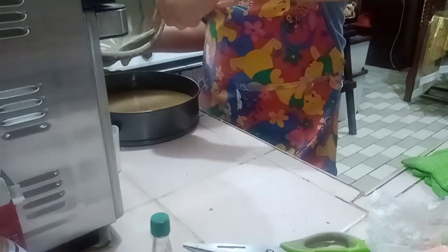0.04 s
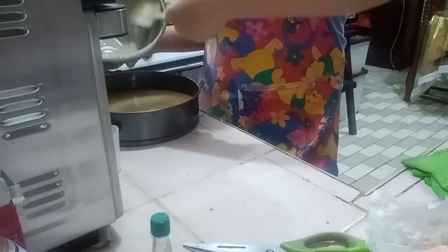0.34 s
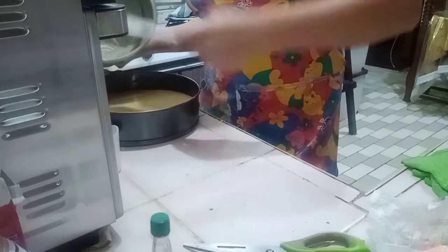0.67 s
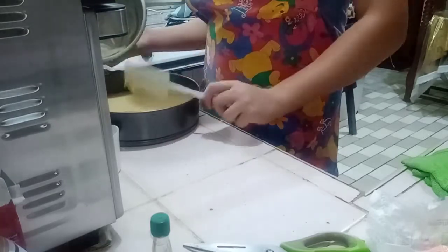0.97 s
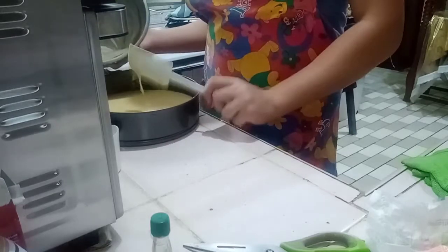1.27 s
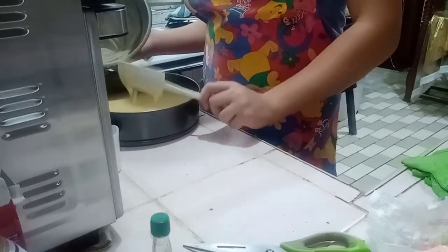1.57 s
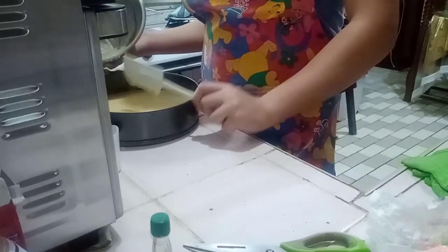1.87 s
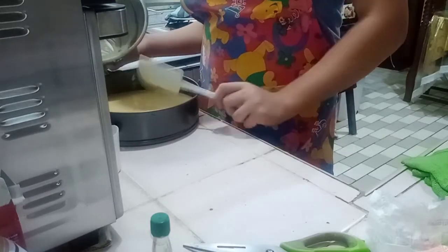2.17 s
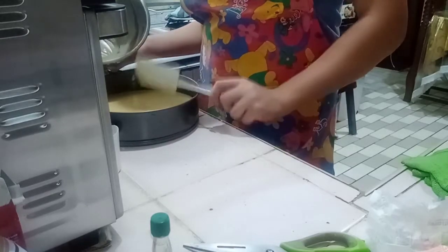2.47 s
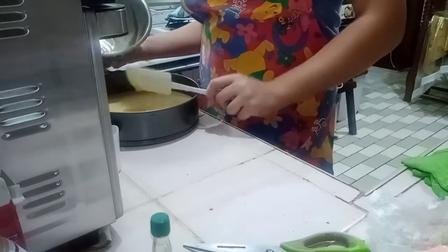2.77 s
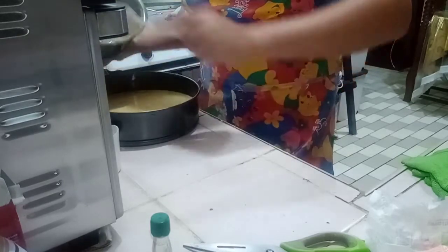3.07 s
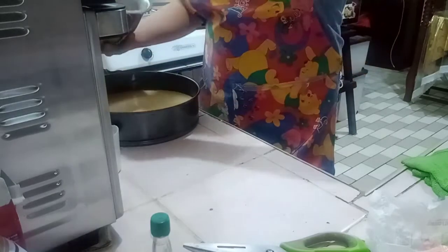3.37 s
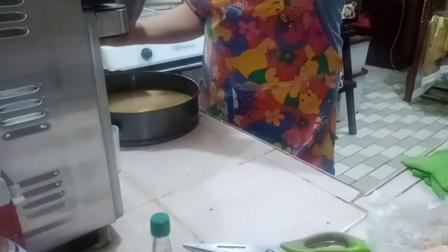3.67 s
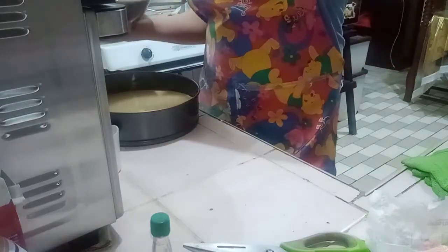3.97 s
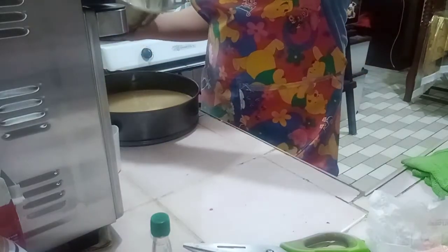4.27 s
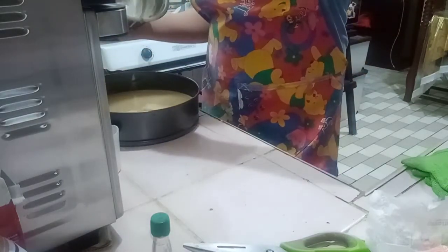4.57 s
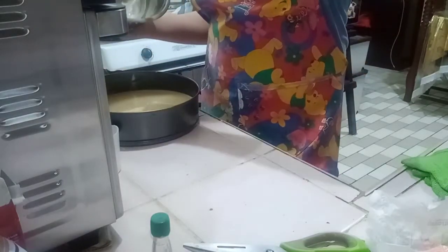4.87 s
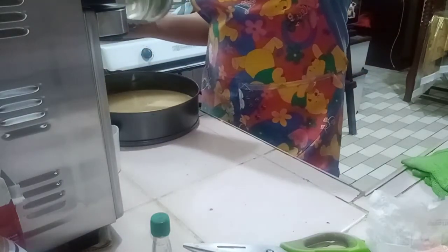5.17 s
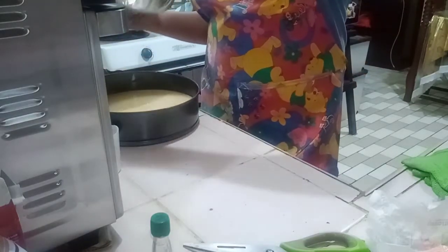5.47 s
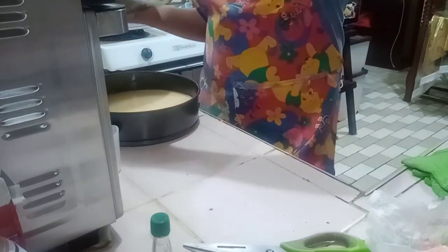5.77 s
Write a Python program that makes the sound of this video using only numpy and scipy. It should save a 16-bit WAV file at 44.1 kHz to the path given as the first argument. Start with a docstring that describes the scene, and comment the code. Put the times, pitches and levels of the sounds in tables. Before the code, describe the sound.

A quick run of sharp clicks and soft thuds comes from a spatula striking the rim of a metal mixing bowl. After a brief pause, the spatula lands on the counter with a clatter and a low thump. Irregular clinks and light scrapes follow as the bowl is handled, its ring cut short each time. The microphone is nearby in a small, slightly echoing kitchen, with a faint, airy appliance hum underneath.

```python
"""A spatula is tapped eleven times on a hand-held metal bowl to shake off batter, in a tiled kitchen.
With each tap the shaft clicks on the rim and the soft blade rebounds with dull thuds. The spatula is
put down with a knock that shakes the worktop. The bowl is turned in the hand, clinking and scraping,
its ring soon choked by hand and batter. An appliance hums underneath."""
import sys
import numpy as np
from scipy import signal
from scipy.fft import rfft, irfft
from scipy.io import wavfile
from scipy.ndimage import uniform_filter1d

SR = 44100
rng = np.random.default_rng(int(sys.argv[2]) if len(sys.argv) > 2 else 0)


def bounce(signal):
    """Save signal as a 16-bit WAV file at the path given by the first command-line argument."""
    frames = np.transpose(np.atleast_2d(signal))
    limited = np.clip(frames, -1, 1)
    pcm = np.round(limited * 32767).astype(np.int16)
    wavfile.write(sys.argv[1], SR, pcm)


N = 256441
T = np.arange(int(0.7 * SR)) / SR  # seconds within one event


def amp(db):
    """Decibels to gain."""
    return 10 ** (np.asarray(db) / 20)


def unit_rms(x):
    """Scales to unit rms."""
    return x / np.sqrt(np.mean(x ** 2) + 1e-20)


def curve_at(points, hz):
    """Reads a table on a log-frequency axis."""
    freqs, values = np.transpose(points)
    return np.interp(np.log(hz + 1), np.log(freqs + 1), values)


def add(mix, start, sound):
    """Mixes a sound in at a start time in seconds."""
    part = mix[round(start * SR):][:len(sound)]
    part += sound[:len(part)]


def noise(colour, size, tilt_db=0):
    """Unit noise of a given colour, tilted by so many dB an octave."""
    hz = np.fft.rfftfreq(size, 1 / SR)
    gain = amp(curve_at(colour, hz) + tilt_db * np.log2(hz + 1))
    return unit_rms(irfft(gain * np.exp(2j * np.pi * rng.random(len(hz))), size))


def burst(colour, hold, fade, tilt_db=0):
    """Contact noise: chatters while the surfaces touch, then dies quickly (times in seconds)."""
    grit = noise(colour, size=4096, tilt_db=tilt_db)
    grit = np.pad(grit, (0, len(T) - len(grit)))
    attack = np.minimum(T * SR / 10, 1)
    return grit * np.exp(-np.maximum(T - hold, 0) / fade) * attack


def ring(modes, rise, scatter_db=0, detune=0):
    """Dying modes; scatter and detune vary them, as each blow lands elsewhere."""
    hz, db, t60 = np.transpose(modes)[:, :, None]
    weight, shift = rng.standard_normal((2, len(modes), 1))
    decays = amp(db + scatter_db * weight - 60 * T / t60)
    partials = decays * np.sin(2 * np.pi * hz * (1 + detune * shift) * T)
    return partials.sum(0) * (1 - np.exp(-T / rise)) / np.sqrt(np.sum(amp(db) ** 2) / 2)


# Reverb of the tiled room. Each row: frequency in Hz, T60 in seconds.
ROOM_DECAY = [(100, 0.98), (500, 0.32), (1500, 0.41), (4000, 0.3), (7000, 0.3), (10000, 0.27),
              (15000, 0.17)]
def kitchen(x, wet_db, near_db, near_t60):
    """Adds quick reflections off counter and oven, then the room's tail, both fresh for each sound."""
    signs = rng.choice([-1., 1.], (2, len(T)))
    late, early = signs * (rng.random((2, len(T))) < 0.1)
    hz, t, spectrum = signal.stft(late, SR, nperseg=256)
    decay = amp(-60 * t / curve_at(ROOM_DECAY, hz)[:, None])
    tail = signal.istft(spectrum * decay, SR, nperseg=256)[1][:len(T)]
    tail *= np.clip((T - 0.005) / 0.0034, 0, 1)  # pre-delay
    near = early * amp(-60 * T / near_t60) * (T > 0.003)
    echoes = amp(wet_db) * tail / np.linalg.norm(tail) + amp(near_db) * near / np.linalg.norm(near)
    return signal.fftconvolve(x, echoes + (T == 0))


# Colour of the noise floor. Each row: frequency in Hz, relative level in dB.
FLOOR_COLOUR = [(25, 7), (100, 13.5), (400, 10), (1200, 9.5), (4000, -1.5), (8000, -10.5), (15000, -1)]
def faint_hiss():
    """A steady, barely audible hiss."""
    return amp(-74) * noise(FLOOR_COLOUR, size=N)


def restless(x, depth_db):
    """Drifting patches of level, a few hundred Hz wide and a tenth of a second long."""
    spectrum = signal.stft(x, SR, nperseg=1024)[2]
    patches = uniform_filter1d(rng.standard_normal(spectrum.shape), size=9, axis=0)
    patches = unit_rms(uniform_filter1d(patches, size=9, axis=1))
    return signal.istft(spectrum * amp(depth_db * patches), SR, nperseg=1024)[1][:N]


# Colour of the rushing air. Each row: frequency in Hz, relative level in dB.
AIR_COLOUR = [(25, -38), (45, -20), (80, -3), (180, -6.5), (250, -19.5), (370, -10.5), (600, -14.5),
              (950, -6.5), (1350, -12), (1900, -13), (3200, -21), (5400, -28.5), (6500, -32.5),
              (10000, -37), (13000, -48.5), (15200, -40.5)]
# Bands of hum. Each row: centre in Hz, width in Hz, level in dB before the swell.
HUM_BANDS = [(99.7, 39, -53), (155, 21.4, -53), (211.3, 16.8, -60), (380, 54, -63.5), (529.4, 15, -62.5),
             (1296, 157, -48.5)]
# Slow swell of the low hum. Each row: time in seconds, gain in dB.
HUM_SWELL = [(0, -2), (.45, -0.5), (.6, 8.5), (.9, -3), (2.8, -0.5), (3.2, -7), (4.1, 3.5), (4.8, 0.5),
             (5.8, 1)]
def appliance():
    """A rush of air with narrow, restless bands of hum."""
    hz, t = np.fft.rfftfreq(N, 1 / SR), np.arange(N) / SR
    swell = amp(np.interp(t, *np.transpose(HUM_SWELL)))
    out = amp(-48) * noise(AIR_COLOUR, size=N)
    for centre, width, db in HUM_BANDS:
        band = (1 + ((hz - centre) / width) ** 2) ** -3
        hum = unit_rms(irfft(rfft(rng.standard_normal(N)) * band, N))
        out += amp(db) * hum * (swell if centre < 300 else 1)
    return restless(out, depth_db=2)


# Low modes of the counter. Each row: pitch in Hz, relative level in dB, T60 in seconds.
COUNTER_MODES = [(95, -7, 0.91), (114.7, -9, 0.33), (155.7, -9, 0.26)]
def counter_boom(db, rise, detune=0):
    """The counter booms faintly under a contact."""
    return amp(db) * ring(COUNTER_MODES, rise, detune=detune)


# Landings of the spatula. Each row: start in seconds, clatter in dB, thump in dB.
LANDINGS = [(3.4065, -19.5, -17.5), (3.4128, -22, -9), (3.429, -31, -42), (3.494, -35, -31)]
# Colour of the clatter. Each row: frequency in Hz, relative level in dB.
CLATTER_COLOUR = [(30, -26), (75, -11), (170, -14), (230, -8), (320, -3), (700, 6.5), (950, -6.5),
                  (1250, 5.5), (1600, -12), (2300, -6.5), (4000, -15.5), (5500, -14.5), (9000, -27),
                  (13000, -37), (15200, -35)]
# Modes of the thump. Each row: pitch in Hz, relative level in dB, T60 in seconds.
WORKTOP_MODES = [(73.3, -16, 0.48), (94.4, -4, 0.4), (131, -7, 0.27), (145.3, 3.5, 0.17),
                 (176.5, -13, 0.42), (504, -12, 0.16), (604.6, -7, 0.099), (740, -14, 0.16),
                 (1195, -11.5, 0.089), (2167, -8, 0.14), (2450, -17, 0.18)]
def spatula_put_down():
    """Handle and blade land one after the other and shake the worktop."""
    out = np.zeros(N)
    for start, clatter_db, thump_db in LANDINGS:
        clatter = amp(clatter_db) * burst(CLATTER_COLOUR, hold=0.0071, fade=0.0052)
        add(out, start, kitchen(clatter, wet_db=-4.5, near_db=-4, near_t60=0.076))
        thump = amp(thump_db) * ring(WORKTOP_MODES, rise=0.0099)
        add(out, start, kitchen(thump, wet_db=-10, near_db=-38, near_t60=0.08))
    return out


def ring_flutter(depth_db, hz):
    """A quick random waver of level and phase that roughens the bowl's ring."""
    points = rng.standard_normal((2, int(hz) + 2))
    level, phase = (np.interp(T * hz, np.arange(len(row)), row) for row in points)
    return amp(depth_db * (np.clip(level, -1, 1) + 1j * phase))


LOWER_HZ, UPPER_HZ = 614.7, 667  # the bowl's lowest mode, split in two by the grip
# Light scrapes. Each row: start in seconds, length in seconds, hiss in dB, tilt in dB per octave.
SCRAPES = [(0.265, 0.22, -58.5, 2.5), (3.35, 0.081, -45, 3.5), (3.776, 0.088, -54.5, 2),
           (4.35, 0.19, -47.5, 0), (4.435, 0.063, -44, 0.5), (5.534, .12, -48.5, 7)]
# Colour of a scrape. Each row: frequency in Hz, relative level in dB.
SCRAPE_COLOUR = [(1500, 4), (3600, 11.5), (6300, 2.5), (8000, 1), (10500, -5.5), (13000, -27), (15500, -24)]
def bowl_scrapes():
    """Tiny slips each ring the same patch of wall for a moment, and the lowest mode sings along."""
    out = np.zeros(N)
    slips_per_second = 1200
    lower = np.exp(2j * np.pi * LOWER_HZ * T)
    for start, length, hiss_db, tilt_db in SCRAPES:
        stroke = np.sin(np.pi * np.minimum(T / length, 1)) ** 2
        slips = rng.standard_normal(len(T)) * (rng.random(len(T)) < slips_per_second / SR)
        patch = burst(SCRAPE_COLOUR, hold=0.0017, fade=0.006, tilt_db=tilt_db)
        grit = amp(hiss_db) * unit_rms(signal.fftconvolve(slips, patch)[:len(T)])
        tone = amp(hiss_db - 2) * (ring_flutter(depth_db=-3.5, hz=114.9) * lower).imag
        add(out, start, kitchen(stroke * (grit + tone), wet_db=-4.5, near_db=-8, near_t60=0.056))
    return out


# Modes of the bowl's wall. Each row: pitch in Hz, relative level in dB, T60 in seconds.
WALL_MODES = [(443, 22.5, 0.038), (932, -18.5, .35), (1328, -3, 0.13), (1670, 5, 0.026), (2196, 1, 0.051),
              (2400, -2, 0.041), (3170, 3, .03), (3610, 9, .025), (3980, -1.5, 0.055), (4350, -4, 0.026),
              (4860, 2, .05), (5500, -2, .07)]
def wall_ping(contact_hz):
    """A contact wakes most strongly the modes of the wall that lie near its own pitch."""
    db_per_octave = -21.5
    modes = [(hz, db + db_per_octave * abs(np.log2(hz / contact_hz)), t60) for hz, db, t60 in WALL_MODES]
    strength = np.linalg.norm([amp(db) for _, db, _ in modes])
    return strength * ring(modes, rise=0.00086)


# Clinks of the turning bowl. Each row: start in seconds, lower mode in dB, upper mode in dB,
# ring time in seconds, clack in dB, tick in dB, pitch of the contact in Hz.
CLINKS = [(3.274, -49, -58, 0.036, -48, -57, 5200), (3.63, -14, -24, 0.037, -25.5, -40.5, 2280),
          (3.717, -19.5, -30, 0.046, -26, -45, 3550), (4.3019, -31, -61, 0.065, -31, -31, 4300),
          (4.711, -37.5, -59, 0.073, -54, -39.5, 8000), (4.798, -27.5, -20.5, 0.05, -34.5, -48.5, 1630),
          (5.0785, -16.5, -47, 0.037, -30, -46.5, 1430), (5.101, -13.5, -25.5, .023, -26.5, -60, 1000),
          (5.17, -19.5, -30, 0.05, -28, -62, 3000), (5.451, -42.5, -54, .044, -48, -43, 2600),
          (5.797, -45, -58, .05, -50.5, -46, 2600)]
# Colours of the clack and the fine tick. Each row: frequency in Hz, relative level in dB.
CLACK_COLOUR = [(250, -39), (450, -4.5), (900, 0.5), (1350, 6.5), (1750, -0.5), (2300, 4.5), (3500, 5),
                (4000, -1), (5600, 0), (6200, -19.5), (9000, -22), (14000, -53)]
TICK_COLOUR = [(2500, -26), (5200, -30), (6500, 3.5), (7700, 5.5), (9500, 2), (10800, -4), (12200, -7),
               (13700, -36), (15200, -7.5)]
def bowl_clinks():
    """Each clink wakes a beating pair of bowl modes; hand and batter soon choke them."""
    out = np.zeros(N)
    lower, upper = np.exp(2j * np.pi * LOWER_HZ * T), np.exp(2j * np.pi * UPPER_HZ * T)
    for start, lower_db, upper_db, ring_time, clack_db, tick_db, contact_hz in CLINKS:
        choke = np.exp(-(T / ring_time) ** 2) * (1 - np.exp(-T / 0.004))
        pair = amp(lower_db) * lower - amp(upper_db) * upper
        tone = np.sqrt(2) * choke * (ring_flutter(depth_db=1.5, hz=280) * pair).imag
        tilt_db = 4 * np.log2(contact_hz / 1900)  # higher contacts sound brighter
        clack = amp(clack_db) * burst(CLACK_COLOUR, hold=0.0038, fade=0.0089, tilt_db=tilt_db)
        tick = amp(tick_db) * burst(TICK_COLOUR, hold=0.0026, fade=0.0077, tilt_db=tilt_db)
        add(out, start, kitchen(tone, wet_db=-15.5, near_db=-15.5, near_t60=0.11))
        add(out, start, kitchen(clack + tick, wet_db=-3, near_db=-4.5, near_t60=0.1))
        ping = amp(clack_db) * wall_ping(contact_hz)
        add(out, start, kitchen(ping, wet_db=-7, near_db=-10, near_t60=0.045))
        add(out, start, counter_boom(clack_db - 11, rise=0.0056))
    return out


# Colour of a soft contact. Each row: frequency in Hz, relative level in dB.
THUD_COLOUR = [(150, -43), (280, -48), (385, -1), (530, -0.5), (680, 4), (1000, -8), (1230, 1.5),
               (1500, -14), (1950, -10), (3000, -31), (7000, -42), (12000, -76)]
def dull_thud(db, hold, fade, tilt_db=0):
    """The dull noise that gives a tap or a rebound its body."""
    return amp(db) * burst(THUD_COLOUR, hold, fade, tilt_db)


# Ring after a rebound. Each row: pitch in Hz, relative level in dB, T60 in seconds.
BLADE_MODES = [(399, 13, 0.16), (511, 3.5, 0.35), (690, -4, 0.074), (782, -1, 0.096), (888, 7.5, 0.22),
               (1184, -14, 0.19)]
def blade_rebound():
    """The soft blade falls back on the bowl, shudders for a few cycles as it presses, then lifts off."""
    shudder_hz, press_seconds = 686.4, 0.0086
    press = np.clip(np.minimum(T, press_seconds - T) / 0.0024, 0, 1)
    shudder = np.sqrt(2) * press * np.sin(2 * np.pi * shudder_hz * T)
    thud = dull_thud(db=-7.5, hold=0.0075, fade=0.0031, tilt_db=4.5)
    tone = amp(-12) * ring(BLADE_MODES, rise=0.004, scatter_db=1.5, detune=0.006)
    return kitchen(shudder + thud + tone, wet_db=-7.5, near_db=-26, near_t60=0.07)


# Colours of the click and the wall's crowded high modes. Each row: frequency in Hz, relative level in dB.
CLICK_COLOUR = [(900, -27.5), (1700, -9), (2300, -7.5), (3100, 5), (4300, -4.5), (5400, -1.5), (6300, -9.5),
                (7100, -6), (8000, -18.5), (10500, -22), (13800, -31.5), (15200, -30)]
SHIMMER_COLOUR = [(5000, -52), (6000, -31), (6500, -25), (6950, 3), (7400, -12), (7900, -39), (9000, -65)]
def shaft_click(tilt_db, layers=4):
    """A dry, even click with a bright shimmer, blended from several noise bursts."""
    out = np.zeros(len(T))
    for _ in range(layers):
        click = amp(1) * burst(CLICK_COLOUR, hold=0.0048, fade=0.002, tilt_db=tilt_db)
        shimmer = amp(-15 + 2 * tilt_db) * burst(SHIMMER_COLOUR, hold=0.0069, fade=0.0072)
        out += kitchen(click + shimmer, wet_db=-6.5, near_db=-6, near_t60=0.057)[:len(T)]
    return out / np.sqrt(layers)


# Spatula taps. Each row: start in seconds, click in dB, tilt in dB per octave, thud in dB, rebound count.
TAPS = [(0.9505, -23.5, 0, -29, 2), (1.1285, -28, -2.5, -22.5, 2), (1.3001, -23, 1, -26, 1),
        (1.4735, -20.5, 4.5, -18.5, 1), (1.6330, -28, -1, -29.5, 1), (1.8013, -28, 0.5, -29, 1),
        (1.9911, -24.5, 1.5, -19, 2), (2.1713, -19, -1, -17.5, 2), (2.3256, -21.5, 2, -23, 1),
        (2.4826, -21.5, -1, -15.5, 2), (2.6181, -24.5, -4, -25.5, 1)]
# Ring of the rim. Each row: pitch in Hz, relative level in dB, T60 in seconds.
RIM_MODES = [(2000, -19, 0.13), (2590, 9, 0.1), (2950, 7, 0.019), (3420, -14, 0.0093), (3530, 5, 0.084),
             (4830, 21, 0.023), (5000, -14, 0.025), (7200, -16, 0.034), (7130, -6, .04)]
# The counter's boom under the taps. Each row: time in seconds, level in dB.
BOOM_LEVELS = [(2.0, -42), (2.18, -25.5), (2.62, -36)]
def spatula_taps():
    """The shaft clicks and rings the rim; the soft blade rebounds, each time sooner and weaker."""
    out = np.zeros(N)
    first_gap_seconds, gap_ratio, loss_db = 0.0295, 0.66, 2.5
    for start, click_db, tilt_db, thud_db, rebounds in TAPS:
        body = dull_thud(db=-19.5 + 0.39 * thud_db, hold=0.0069, fade=0.037)
        add(out, start, amp(click_db) * shaft_click(tilt_db))
        add(out, start, amp(click_db + 0.5) * ring(RIM_MODES, rise=0.0012, detune=0.0017))
        add(out, start, kitchen(body, wet_db=-5, near_db=-8.5, near_t60=0.1))
        boom_db = np.interp(start, *np.transpose(BOOM_LEVELS))
        add(out, start + 0.01425, counter_boom(boom_db, rise=0.0088, detune=0.032))
        landing = start
        for k in range(rebounds):
            landing += first_gap_seconds * gap_ratio ** k
            add(out, landing, amp(thud_db - k * loss_db) * blade_rebound())
    return out


def scene():
    """Spatula, bowl and appliance sit in the centre; only the faint hiss has width."""
    mid = spatula_taps() + spatula_put_down() + bowl_clinks() + bowl_scrapes() + appliance()
    side = faint_hiss()
    return np.array([mid + side, mid - side])


def record(dry):
    """A steep low-pass trims the very top of the treble."""
    lowpass = signal.firwin(301, cutoff=15700, window=("kaiser", 8), fs=SR)
    return signal.oaconvolve(dry, lowpass[None], "same")


dry = scene()
out = record(dry)
bounce(out)
```